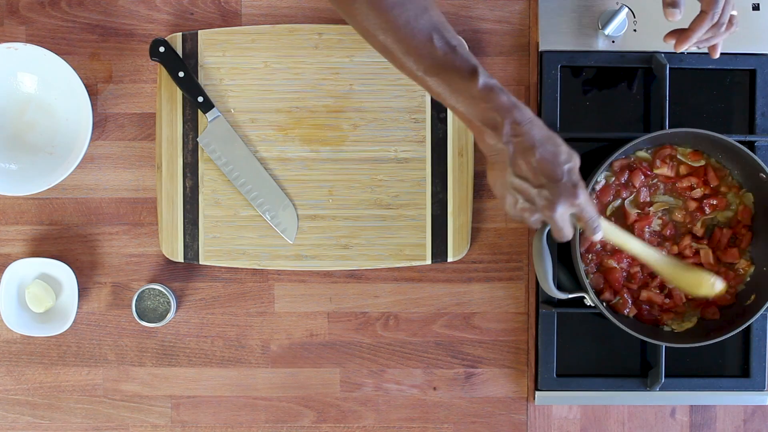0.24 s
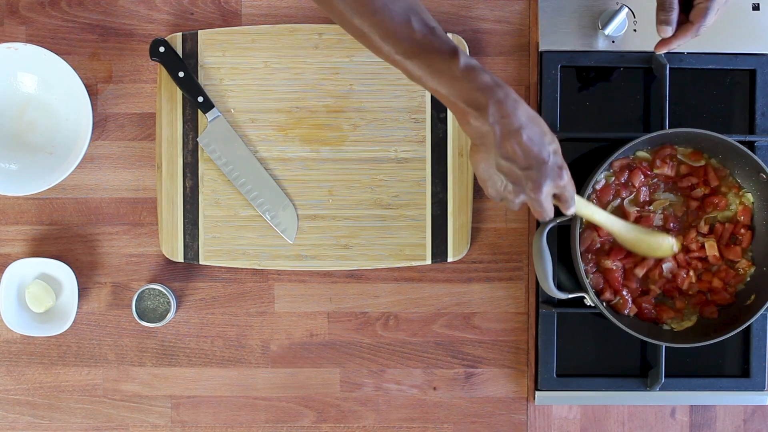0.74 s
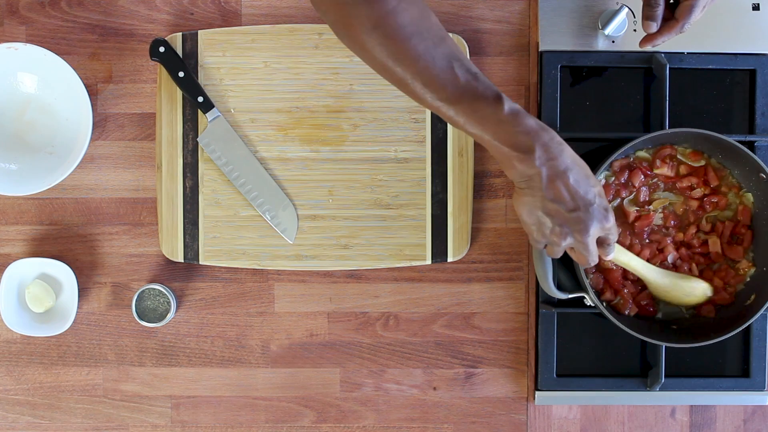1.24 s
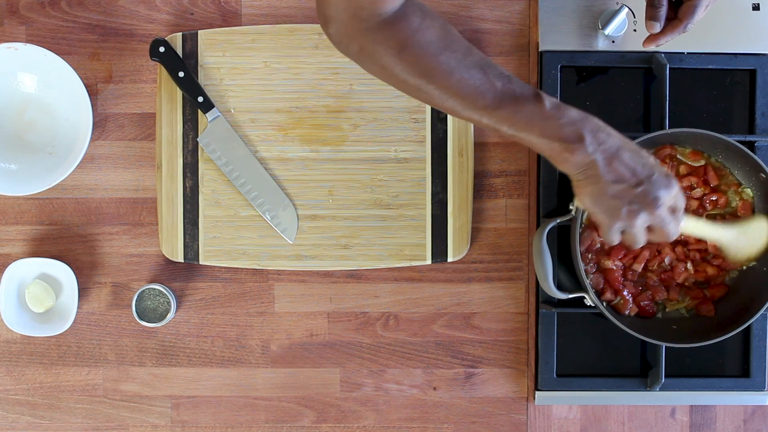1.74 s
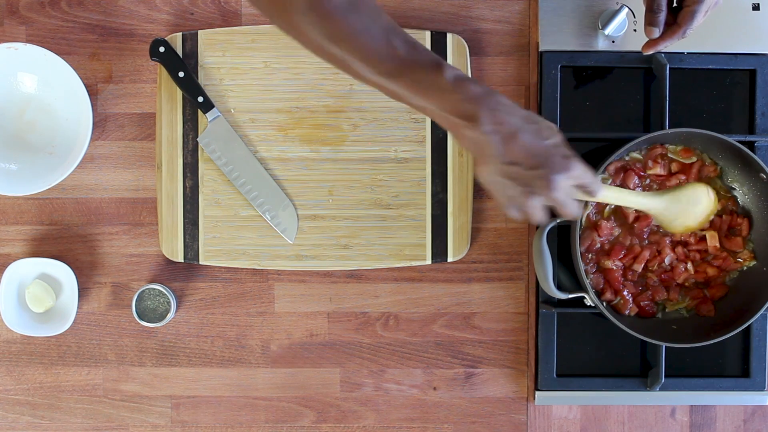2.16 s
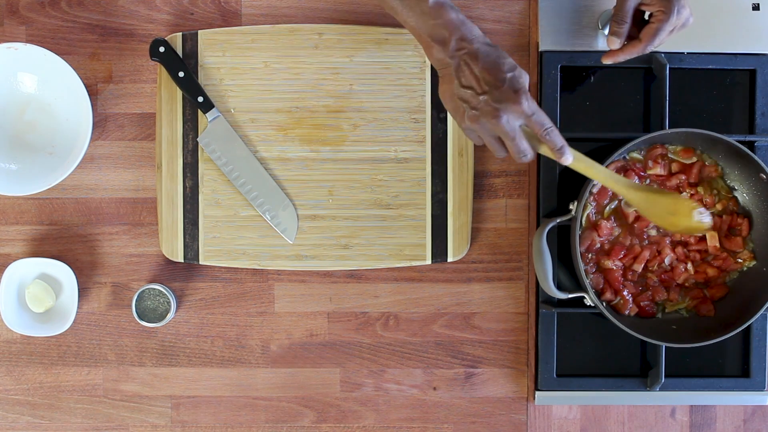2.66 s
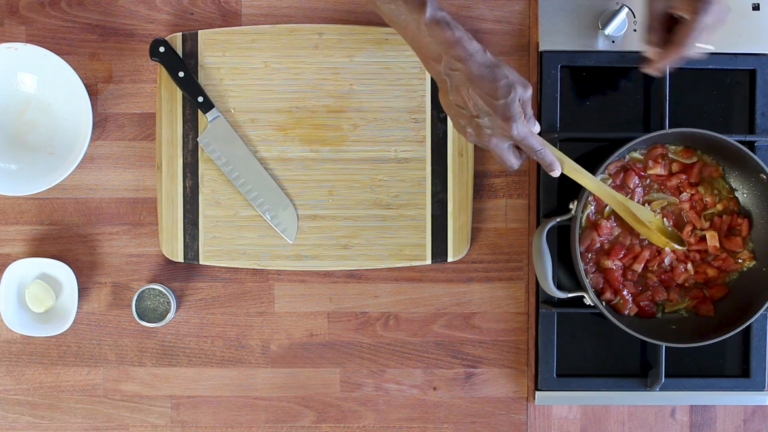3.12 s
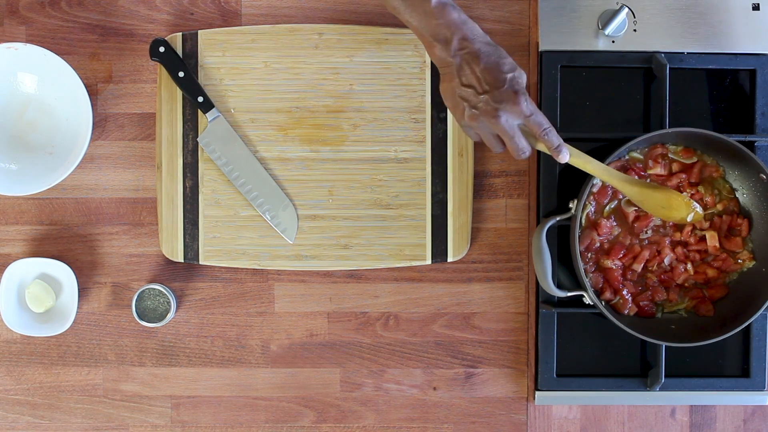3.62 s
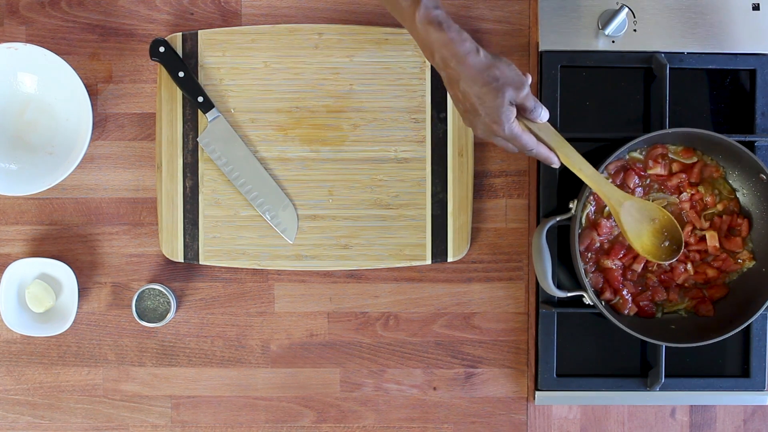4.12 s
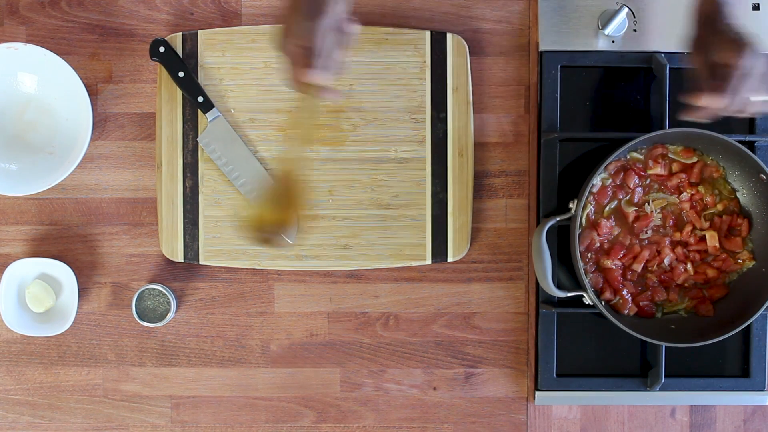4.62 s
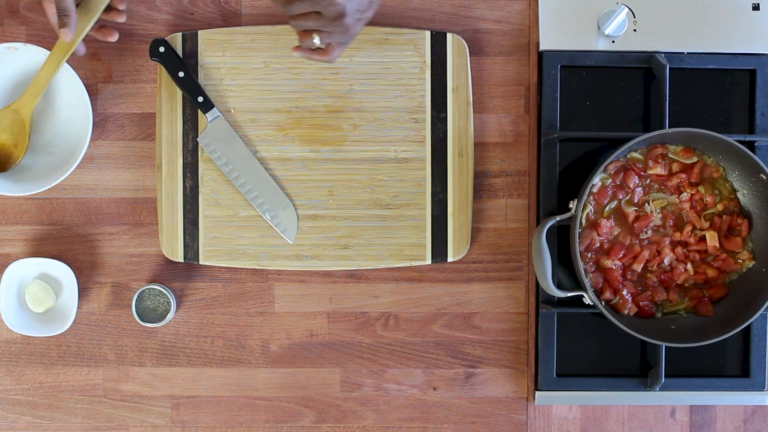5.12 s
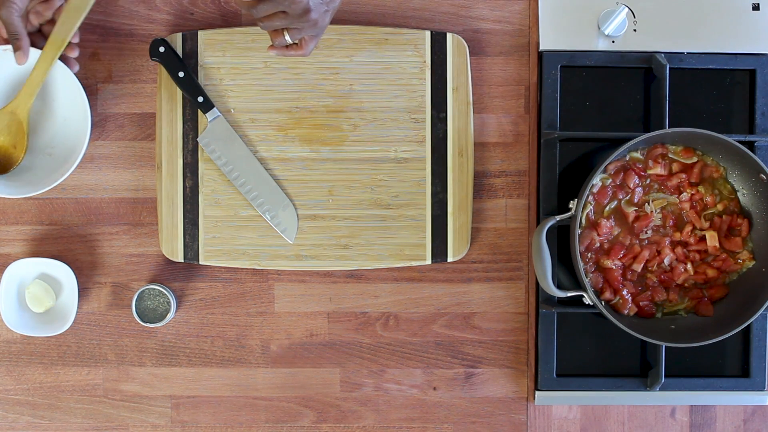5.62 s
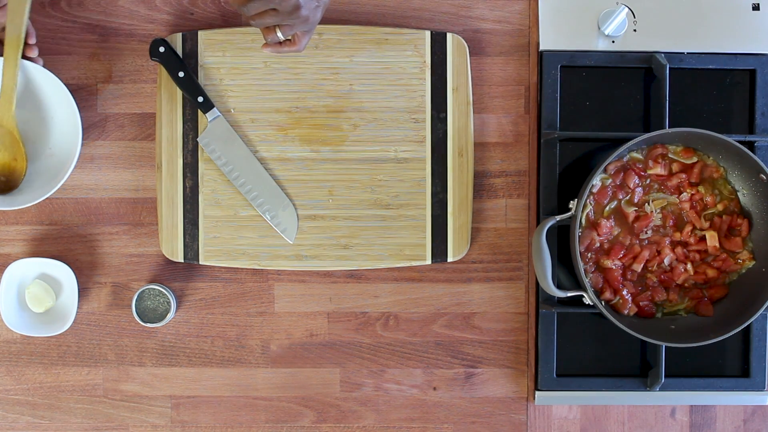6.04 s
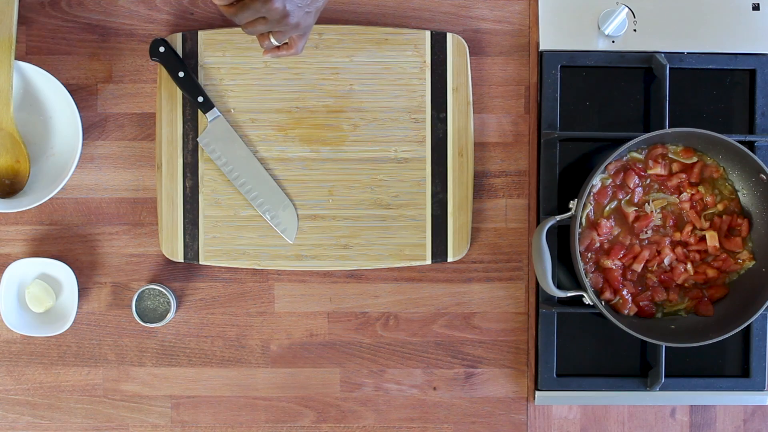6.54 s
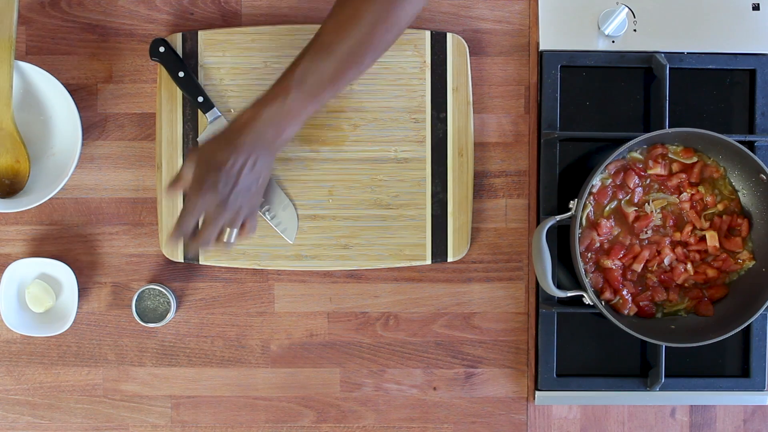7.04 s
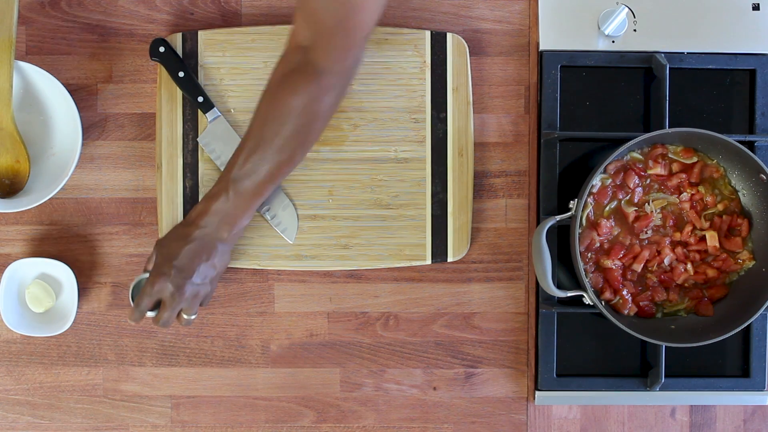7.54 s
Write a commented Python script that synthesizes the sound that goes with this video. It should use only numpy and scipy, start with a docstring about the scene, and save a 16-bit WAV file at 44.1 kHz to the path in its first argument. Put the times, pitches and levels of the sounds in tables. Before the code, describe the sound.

A gas flame rushes softly throughout, under the faint sizzle of chopped tomatoes in a pan, with tiny spits and bubble pops. For the first 2.5 seconds a wooden spoon stirs with soft wet smacks, bumping the pan wall dully at about 1.5 and 1.8 seconds. The sizzle swells slightly around 2 seconds. The spoon raps the rim hard at 2.6, 2.8 and 3.6 seconds, the first doubled by a knock, the last loudest; each time the pan rings briefly and clacks on its iron grate. Lighter knocks come near 3.1 and 4.2 seconds. At 5 seconds the spoon lands in a china bowl with a thud, a short chime and a softer second tap. Hands faintly bump the counter between 5.7 and 7.3 seconds, while the sizzle settles, dipping after 7 seconds. Everything is heard from above the counter, with a small kitchen's short reverberation.

```python
"""A gas flame rushes softly under a faint sizzle: tiny steam bursts among chopped tomatoes in a pan.
A wooden spoon stirs with wet smacks, bumps the wall, then raps the rim three times. Each impact excites
the pan's damped modes, and each rap makes it chatter on its iron grate. The spoon is laid in a china
bowl, which chimes, and hands bump the counter. A small, hard kitchen answers every knock."""
import sys
import numpy as np
from scipy import signal
from scipy.fft import rfft, irfft, next_fast_len
from scipy.io import wavfile

SR = 44100
rng = np.random.default_rng(int(sys.argv[2]) if len(sys.argv) > 2 else 0)


def pcm_store(signal):
    """Save signal as 16-bit PCM."""
    levels = np.round(np.clip(np.atleast_2d(signal), -1, 1) * 32767)
    wavfile.write(sys.argv[1], SR, levels.astype(np.int16).T)


N = 342774
RING_T = np.arange(SR) / SR  # time axis of one decay, t/s

# reverberation time of the kitchen: f/Hz, t60/s
KITCHEN_T60 = [(60, 0.76), (200, .46), (500, 0.57), (1200, 0.53), (3000, 0.44), (7500, 0.26), (15000, 0.19)]
# spectrum of the gas flame: f/Hz, level/dB
FLAME_SPECTRUM = [(20, -5), (45, -5.5), (70, -2), (105, -0.5), (155, 1), (205, -3.5), (370, -1), (900, -12),
                  (1800, -8), (2200, -7), (4500, -15), (9000, -18.5), (16000, -25.5)]
# resonances of the space under the pan: f/Hz, level/dB, t60/s
CAVITY_MODES = [(679, 3, 0.011), (1186, 1, 0.019), (1361, 2, 0.013), (1786, -4, 0.021), (3345, -14, 0.045),
                (4490, -16.5, 0.041)]
# their hollow rush, sinking once the stirring is over: t/s, level/dB
CAVITY_LEVEL = [(4.3, -55.5), (5.6, -59.5)]
# spectrum of the sizzle: f/Hz, level/dB
SIZZLE_SPECTRUM = [(1000, -19), (1600, -3), (3000, -1), (5200, -1), (6500, -0.5), (7500, -1), (10000, -3),
                   (12500, -8), (15500, -20.5)]
# surges as the spoon turns fresh juice onto hot metal: t/s, level/dB
TURNS = [(.12, 2.5), (2.08, 4.5)]
# an arm reaches across and shades the sizzle: t/s, level/dB
ARM_SHADOW = [(7, -1), (7.35, -8.5), (7.77, -5)]
# the largest bursting bubbles: t/s, level/dB, f/Hz
POPS = [(1.098, -27, 2600), (1.242, -28, 8200), (1.346, -24.5, 2600), (1.528, -24.5, 7500),
        (1.688, -26, 2880), (6.071, -25, 1350), (6.2175, -24.5, 3060)]
# soft knocks of the spoon on the pan wall, and its rebounds after the first two raps (2.6691 s, 3.062 s): t/s,
# level/dB, note of the struck spot f/Hz, its relative level/dB
KNOCKS = [(1.509, -4, 1058, -5.5), (1.842, -7.5, 655, -4), (1.854, -4.5, 1003, -12.5),
          (1.864, -3.5, 820, -16), (2.6691, 10, 1120, -14), (3.062, -13, 1070, -8),
          (4.2013, -10, 1138, -9.5)]
# hard raps on the rim: t/s, level/dB, note of the struck spot f/Hz, its relative level/dB
RAPS = [(2.6184, 9, 1230, -28), (2.8126, 10.5, 446.4, -6), (3.6335, 15, 700, -15)]
# heavily damped modes of spoon and loaded pan: f/Hz, level/dB, t60/s
CONTACT_MODES = [(505, -0.5, 0.023), (740, -17, 0.029), (1150, 6, 0.07), (1749, 5.5, 0.027),
                 (2620, -4, 0.048), (4390, -11, 0.02), (7500, -6, 0.011)]
# lasting modes of the pan on the stove: f/Hz, level/dB, t60/s
PAN_MODES = [(70.5, -1, .42), (118, -3, .4), (209, 2, .42), (266, -5, .35), (315, -1, .4), (346, -5, .33),
             (407, -7, .4), (446, -6, .4), (479, -5, .35), (499, 0, .33), (570, -5, .35), (709, -3, .33),
             (740, -7, .35), (878, -11, .4), (1153, -3, .34), (1211, -7, .42), (1231, -4, .36),
             (1285, -3, .3), (1430, -4, .27), (1514, -2, .24), (1575, -4, .22), (1675, -2, .28),
             (1746, 0, .29), (1922, -11, .2), (2530, -13, .27), (2622, -10, .26), (4635, -19, .2)]
# spectrum of the pan's dense ring in the room: f/Hz, level/dB
PAN_ROOM_SPECTRUM = [(35, -8), (70, -1.5), (130, -6), (200, -4.5), (400, -1.5), (650, -3), (900, -6.5),
                     (1200, -6), (1750, -6.5), (2200, -14), (2700, -20), (3400, -17), (8000, -29),
                     (15000, -62)]
# the pan's two clacks on the grate: delay after the rap t/s, level/dB
CHATTER = [(.0068, 0.5), (0.0237, -6.5)]
# spectrum of a clack on iron: f/Hz, level/dB
GRATE_SPECTRUM = [(300, -22), (1200, -8.5), (2700, 2), (5200, -1.5), (7300, 4), (10500, -1.5),
                  (13000, -10.5), (16000, -34)]
# spoon landing in the bowl, then its bounce: t/s, level/dB, cutoff f/Hz, chime level/dB, tick level/dB
LANDINGS = [(5.0117, 2, 14000, -6, -12.5), (5.092, -4.5, 7100, -35, -13)]
# modes of the china bowl: f/Hz, level/dB, t60/s, swell time/s
BOWL_MODES = [(880, -9, .35, .002), (1626, -3, .22, .002), (2166, 3, .52, .07), (2186, -5, .5, .062),
              (3747, -12, .45, .002), (5582, 0, .18, .026), (7596, -4, .15, .001), (9850, -17, .16, .001)]
# spectrum of the counter's thud: f/Hz, level/dB
COUNTER_SPECTRUM = [(40, -23), (120, -11.5), (205, 0), (280, -3.5), (380, 0), (650, -5), (1000, -4),
                    (1250, -11), (1650, -14), (2300, -23), (5000, -27), (6500, -35), (16000, -68)]
# spectrum of wood ticking on china: f/Hz, level/dB
TICK_SPECTRUM = [(400, -16), (1500, -6), (2300, -4), (3300, -2), (4000, -1), (5000, -2), (6300, -17),
                 (10000, -16), (16000, -39)]
# hands bumping the counter: t/s, level/dB, f/Hz
BUMPS = [(5.719, -22, 364), (6.07, -28.5, 199), (6.291, -32, 189), (7.29, -24.5, 277)]


def undb(db):
    """Amplitude ratio of a level in decibels."""
    return 10 ** (np.asarray(db) / 20)


def unit(x):
    """Normalisation to unit energy."""
    return x / np.sqrt(np.sum(x ** 2))


def along(hz, points):
    """Interpolation of (f/Hz, value) points on a logarithmic frequency axis."""
    f, value = np.transpose(points)
    return np.interp(np.log(np.maximum(hz, 1)), np.log(f), value)


def curve(rows):
    """Linear interpolation of (t/s, value) rows at every sample."""
    return np.interp(np.arange(N) / SR, *np.transpose(rows))


def colour(x, spectrum):
    """Minimum-phase filtering: folding the cepstrum gives a causal filter with this spectrum."""
    size = 2 * next_fast_len(len(x))
    gain = undb(along(np.fft.rfftfreq(size, 1 / SR), spectrum))
    cepstrum = irfft(np.log(gain))
    cepstrum[1:size // 2] *= 2
    cepstrum[size // 2 + 1:] = 0
    return irfft(rfft(x, size) * np.exp(rfft(cepstrum)))[:len(x)]


def lowpass(x, hz, order):
    """Butterworth low-pass filtering."""
    return signal.sosfilt(signal.butter(order, min(hz, SR / 2 - 1), fs=SR, output="sos"), x)


def fade(t60):
    """Exponential decay, 60 dB down after t60 seconds."""
    return np.exp(-np.log(1000) * RING_T / t60)


def ring(modes, cycles=.01):
    """Modal superposition: damped sines build up over some cycles, neighbours in opposite phase."""
    return unit(sum((-1) ** k * undb(db) * fade(t60) * (1 - np.exp(-hz * RING_T / cycles))
                    * np.sin(2 * np.pi * hz * RING_T) for k, (hz, db, t60) in enumerate(modes)))


def burst(spectrum, t60):
    """Modal overlap: many short-lived modes merge into a crack of decaying noise."""
    return unit(colour(rng.standard_normal(SR) * fade(t60), spectrum))


def kitchen(spectrum, build_s):
    """Reverberation: reflections thicken, then each octave decays at its own rate, treble first."""
    noise, hz = rfft(rng.standard_normal(SR)), np.fft.rfftfreq(SR, 1 / SR)
    octave = np.round(np.log2(np.maximum(hz, 32)))
    tail = sum(irfft(noise * (octave == k), SR) * fade(along(2 ** k, KITCHEN_T60))
               for k in np.unique(octave))
    build_up = 1 - np.exp(-(RING_T / build_s) ** 2)
    return unit(colour(tail * build_up, spectrum))


def add(out, s, sound):
    """Superposition of a sound starting at s seconds."""
    start = int(s * SR)
    out[start:start + len(sound)] += sound[:len(out) - start]


def burner(flame_db=-58, room_db=-2):
    """Forced resonance: the flame's broadband noise drives the room and the cavity under the pan."""
    direct = unit(colour(rng.standard_normal(N), FLAME_SPECTRUM))
    drive = rng.standard_normal(N + SR - 1)
    room = unit(signal.fftconvolve(drive, kitchen(FLAME_SPECTRUM, build_s=.0025), "valid"))
    flame = unit(direct + undb(room_db) * room)
    cavity = unit(signal.fftconvolve(rng.standard_normal(N), ring(CAVITY_MODES))[:N])
    return np.sqrt(N) * (undb(flame_db) * flame + undb(curve(CAVITY_LEVEL)) * cavity)


def bubble(hz, t60, room_db):
    """Band-limited transient: a burst and its reverberation, as noise half an octave wide."""
    crack = unit(rng.standard_normal(SR) * fade(t60))
    tail = unit(rng.standard_normal(SR) * fade(along(hz, KITCHEN_T60)))
    edges = np.minimum(hz * 2 ** (np.array([-1, 1]) / 4), SR / 2 - 1)
    band = signal.butter(2, edges, "bandpass", fs=SR, output="sos")
    return unit(signal.sosfilt(band, crack + undb(room_db) * tail))


def freshness(rise_s=.14, fall_s=.4, settle_db_per_s=.5):
    """Evaporation of fresh juice: the frying level in dB surges at each turn and slowly settles."""
    t = np.arange(N) / SR
    surges = sum(db * np.exp(np.minimum((t - s) / rise_s, (s - t) / fall_s)) for s, db in TURNS)
    return surges - settle_db_per_s * t


def sizzle(base_db=-54.5, bursts_per_band_s=600, spread_db=3.5, flurry_db=2, bands=16):
    """Shot noise: thousands of tiny steam bursts merge, a few much larger than the rest."""
    fizz, fresh_db = np.zeros(N), freshness()
    # the band near 4 kHz resists surge and settling, so it holds nearly steady
    steadying_db = -1 - 1.1 * fresh_db
    for hz in np.geomspace(1500, 16000, bands):
        at = np.flatnonzero(rng.random(N) < bursts_per_band_s / SR)
        chance = rng.standard_normal((len(at), 2))
        flurry = np.interp(at, np.linspace(0, N, 120), rng.standard_normal(120))
        size_db = spread_db * np.minimum(np.sum(chance ** 2, axis=1) / 2, 6) + flurry_db * flurry
        mid_share = along(hz, [(2000, 0), (4200, 1), (7000, 0)])
        clicks = np.zeros(N)
        clicks[at] = np.sign(chance[:, 0]) * undb(size_db + steadying_db[at] * mid_share)
        steam = bubble(hz, t60=.0026, room_db=-.5)[:SR // 4]
        fizz += unit(signal.oaconvolve(clicks, steam)[:N]) * np.sqrt(hz)
    level_db = base_db + fresh_db + curve(ARM_SHADOW)
    return unit(colour(fizz, SIZZLE_SPECTRUM)) * np.sqrt(N) * undb(level_db)


def squelches(level_db=-29, spread_db=3, centre_hz=1250, octaves=.3, count=9, stir_end_s=2.5):
    """Damped midrange transients: soft wet smacks as the spoon pushes the pieces around."""
    out = np.zeros(N)
    for slot, (place, size, pitch) in enumerate(rng.uniform(-1, 1, (count, 3))):
        s = (slot + (place + 1) / 2) / count * stir_end_s
        smack = bubble(centre_hz * 2 ** (octaves * pitch), t60=.04, room_db=-7)
        add(out, s, undb(level_db + spread_db * size) * smack)
    return out


def spits(base_db=-28.5, spread_db=3.5, centre_hz=7500, octaves=.3, count=20):
    """Random treble transients: juice spits, more strongly while the frying is fresh."""
    out, fresh_db = np.zeros(N), freshness()
    for slot, (place, size, pitch) in enumerate(rng.uniform(-1, 1, (count, 3))):
        at = int((slot + (place + 1) / 2) / count * N)
        spit = bubble(centre_hz * 2 ** (octaves * pitch), t60=.012, room_db=-5)
        add(out, at / SR, undb(base_db + spread_db * size + fresh_db[at]) * spit)
    return out


def pops():
    """Sudden pressure release: single large bubbles burst, each around its own pitch."""
    out = np.zeros(N)
    for s, db, hz in POPS:
        add(out, s, undb(db) * bubble(hz, t60=.019, room_db=-7))
    return out


def spoon_on_pan(ring_db=2, room_db=-1, stove_hz=135, echo_s=.002207, echo_db=-3):
    """Impact excitation of modes: soft knocks are dull; hard raps are bright and shake the stove."""
    out = np.zeros(N)
    crack, pan = ring(CONTACT_MODES, cycles=.3), ring(PAN_MODES, cycles=.79)
    knock_hz, rap_base_hz, rap_hz_per_db = 1230, 2320, 324
    tail_loss = .48  # dB per dB: a harder blow puts a smaller share into the after-ring
    # blow, cutoff f/Hz, bass level/dB, after-ring level/dB
    soft = [(row, knock_hz, -12, -9) for row in KNOCKS]
    hard = [(row, rap_base_hz + rap_hz_per_db * row[1], -1, 4.5) for row in RAPS]
    for (s, db, note_hz, note_db), cutoff_hz, bass_db, tail_db in soft + hard:
        tail = undb(ring_db) * pan + undb(room_db) * kitchen(PAN_ROOM_SPECTRUM, build_s=.0038)
        note = undb(note_db) * ring([(note_hz, 0, .5)])
        blow = crack + undb(tail_db - tail_loss * db) * tail + note
        add(blow, echo_s, undb(echo_db) * crack)  # reflection from the stove top
        blow = colour(blow, [(stove_hz / 2, bass_db), (stove_hz * 2, 0)])
        add(out, s, undb(db) * lowpass(blow, cutoff_hz, order=6))
    return out


def grate_chatter(jolt_above_db=12, jolt_s=.0012, jolt_db=-5.5, hop_loss_db=2):
    """Rebound: the pan hops and clacks back on the iron, milliseconds after each rap."""
    out = np.zeros(N)
    for s, rap_db, *_ in RAPS:
        clacks = CHATTER
        if rap_db > jolt_above_db:  # driven into the iron, the pan clacks at once and hops less
            clacks = [(jolt_s, jolt_db)] + [(lag_s, db - hop_loss_db) for lag_s, db in CHATTER]
        for lag_s, db in clacks:
            clack = burst(GRATE_SPECTRUM, t60=.042) + kitchen(GRATE_SPECTRUM, build_s=.0016)
            add(out, s + lag_s, undb(db) * clack)
    return out


def spoon_in_bowl(room_db=3):
    """Free vibration: the spoon lands in the bowl, then bounces once; the china rings and the counter thuds."""
    out = np.zeros(N)
    # some modes swell only as the spoon settles; a close pair beats
    chime = unit(sum(undb(db) * fade(t60) * (1 - np.exp(-(RING_T / swell_s) ** 4))
                     * np.sin(2 * np.pi * hz * RING_T) for hz, db, t60, swell_s in BOWL_MODES))
    for s, db, cutoff_hz, chime_db, tick_db in LANDINGS:
        thud = burst(COUNTER_SPECTRUM, t60=.036)
        room = undb(room_db) * kitchen(COUNTER_SPECTRUM, build_s=.011)
        china = undb(chime_db) * chime + undb(tick_db) * burst(TICK_SPECTRUM, t60=.014)
        add(out, s, undb(db) * lowpass(thud + room + china, cutoff_hz, order=4))
    return out


def hand_bumps():
    """Soft contact excites mainly low frequencies: touches on the counter, heard through the room."""
    out = np.zeros(N)
    for s, db, hz in BUMPS:
        spectrum = [(hz / 3, -20), (hz, 0), (hz * 2, -9), (hz * 8, -50)]
        add(out, s, undb(db) * kitchen(spectrum, build_s=.011))
    return out


def scene():
    """Linear superposition: impacts and cooking add at one point above the counter."""
    impacts = spoon_on_pan() + grate_chatter() + spoon_in_bowl() + hand_bumps()
    cooking = sizzle() + spits() + pops() + squelches() + burner()
    return (impacts + cooking)[None]


def record(dry):
    """Soft saturation rounds the highest peaks; a steep low-pass removes the top of the treble."""
    ceiling, cutoff_hz = .75, 15800
    rounded = ceiling * np.tanh(dry / ceiling)
    return signal.sosfilt(signal.ellip(12, .2, 90, cutoff_hz, fs=SR, output="sos"), rounded)


dry = scene()
out = record(dry)
pcm_store(out)
```